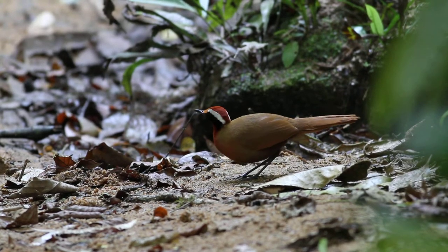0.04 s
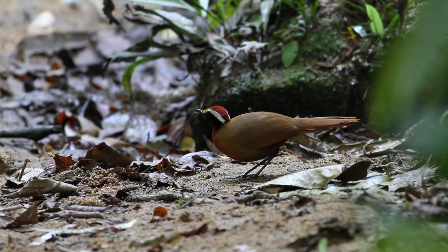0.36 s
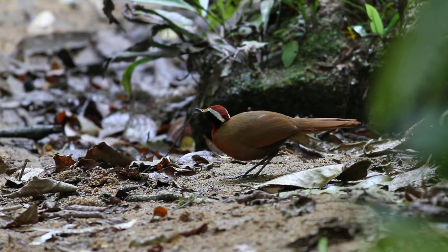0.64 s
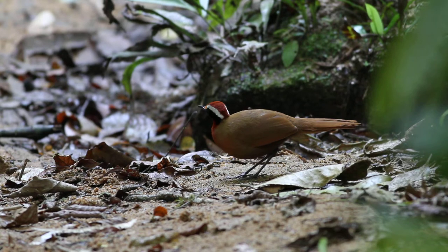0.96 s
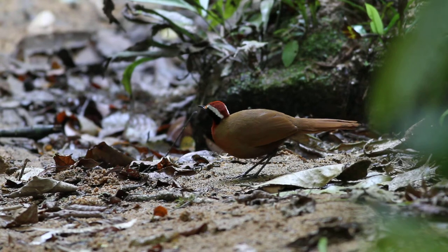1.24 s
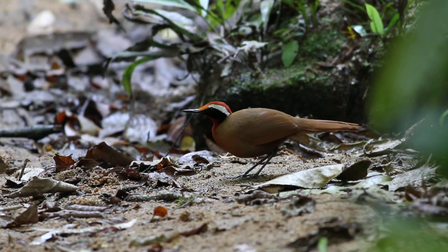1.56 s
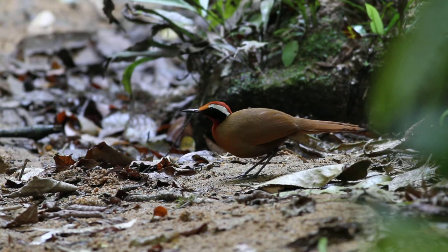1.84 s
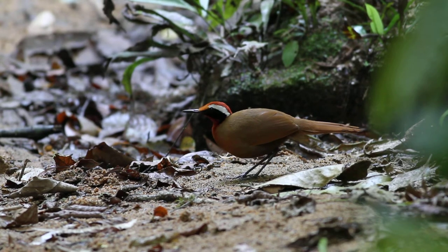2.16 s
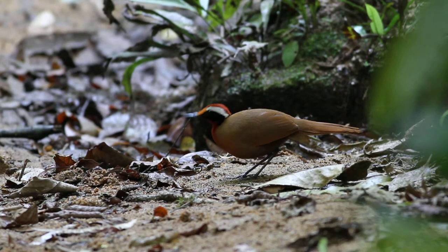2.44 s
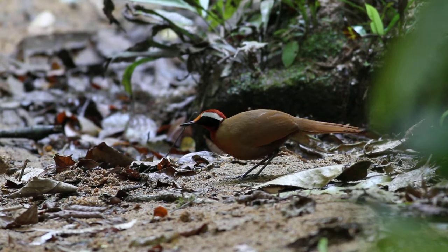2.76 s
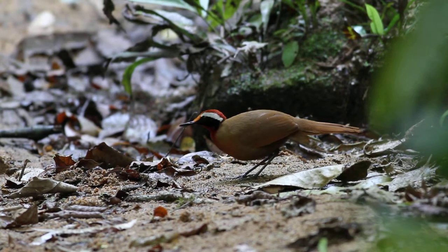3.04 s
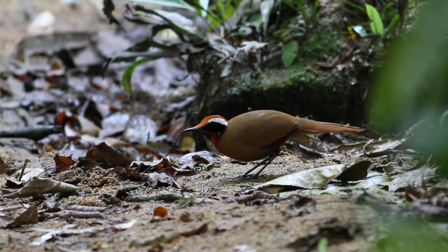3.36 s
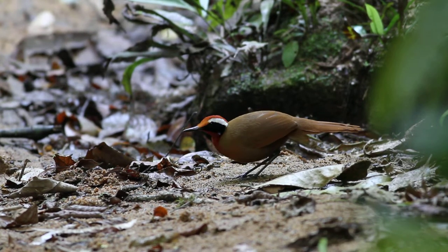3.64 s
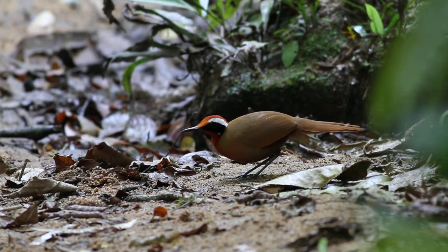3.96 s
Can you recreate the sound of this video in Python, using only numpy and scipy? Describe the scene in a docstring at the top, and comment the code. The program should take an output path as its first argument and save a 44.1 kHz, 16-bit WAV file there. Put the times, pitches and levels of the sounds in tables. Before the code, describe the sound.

A continuous, high cicada drone pulses close by, with thinner buzzes and a distant chorus hissing among the trees. Three quiet bird whistles come early, and small ticks in fallen leaves lead to one brief, late rustle.

```python
"""A loud, throbbing cicada drone fills a forest, at about 3 kHz. Around this near singer, neighbours
throb, and one cicada holds a slowly rising whine that fades in and out among the trees. One rasps, two
buzz, and a high sizzle and a far chorus hiss behind. Cicadas sing by clicking tymbals, small drums on
the body; the belly pumps the sound to make it throb. A bird whistles three times and another holds a
faint low note. Dry leaves on the ground tick, and rustle once near the end."""
import sys
import numpy as np
from scipy import signal
from scipy.fft import rfft, irfft
from scipy.io import wavfile

SR = 44100
rng = np.random.default_rng(int(sys.argv[2]) if len(sys.argv) > 2 else 0)


def wav_out(sig):
    """Save sig, one row per channel (or a flat mono array), as 16-bit PCM at SR to the path in sys.argv[1]."""
    wavfile.write(sys.argv[1], SR, np.round(np.clip(np.atleast_2d(sig).T, -1, 1) * 32767).astype(np.int16))


N = 176400
T = np.arange(N) / SR  # time of each sample [s]
HZ = np.fft.rfftfreq(N, 1 / SR)  # frequency of each slot in a spectrum [Hz]


def amp(db):
    """Turns decibels into a number to multiply by."""
    return 10 ** (np.asarray(db) / 20)


def unit(x):
    """Scales a signal to an average strength (rms) of 1."""
    return x / np.sqrt(np.mean(abs(x) ** 2) + 1e-20)


def curve(rows, column=1):
    """One column of a table, joined by straight lines in time."""
    rows = np.array(rows)
    return np.interp(T, rows[:, 0], rows[:, column])


def colour(points, hz):
    """Reads from a table how strong the given frequencies are."""
    table_hz, db = np.transpose(points)
    return amp(np.interp(np.log(hz + 1), np.log(table_hz + 1), db))


def noise(gain):
    """A hiss of strength 1, shaped by a gain for each frequency."""
    return unit(irfft(rfft(rng.standard_normal(N)) * gain, N))


def drift(rate_hz):
    """A smooth random wobble of strength 1, up to about this fast."""
    return noise(np.exp(-.5 * (HZ / rate_hz) ** 2) * (HZ > 0))


def phase(hz):
    """The growing angle of a wave at this pitch, from a random start."""
    return 2 * np.pi * (np.cumsum(hz * np.ones(N)) / SR + rng.random())


def ring(hz, width_hz):
    """Many tymbals ringing out of step around one pitch."""
    angle = phase(hz)
    return drift(width_hz) * np.cos(angle) + drift(width_hz) * np.sin(angle)


def throbbing(hz, rate_hz, depth, bend=0):
    """A tymbal tone that the belly pumps in level and, with bend, in pitch."""
    beat = np.cos(phase(rate_hz + .3 * drift(5)))
    return unit(np.exp(depth * beat) * np.sin(phase(hz) + bend * beat))


def forest_echo(x, fade_s=.63, delay_s=.023):
    """A blurred echo from trunks and leaves, falling 60 dB in fade_s."""
    t = T[:SR]
    tail = rng.standard_normal(SR) * amp(-60 * t / fade_s) * (t > delay_s)
    return signal.fftconvolve(x, tail / np.linalg.norm(tail))[:N]


# Tone colour of the forest's hush (frequency [Hz], relative level [dB])
AIR_COLOUR = [(20, -17), (50, -10.5), (110, -6.5), (190, -4), (255, 2.5), (360, -2), (700, -4),
              (1400, -6.5), (2200, -2), (6000, -1), (6700, 2), (7350, -3.5), (7800, 7), (8400, -1.5),
              (10000, -1), (11200, -5.5), (12300, -3.5), (12650, 9), (13000, 5), (13900, 9.5), (14400, 3),
              (14750, -16), (15500, -12)]

def forest_air(level_db=-41):
    """A soft, nearly steady hush."""
    return noise(colour(AIR_COLOUR, HZ)) * amp(level_db + .5 * drift(10))


def clicks(rate_hz):
    """One sharp tymbal click in every cycle."""
    samples_from_click = (phase(rate_hz) / (2 * np.pi) % 1 - .5) * SR / rate_hz
    return np.exp(-.5 * samples_from_click ** 2)


# Tone colour of the far chorus (frequency [Hz], relative level [dB])
CHORUS_COLOUR = [(1800, -32.5), (2300, -24), (2520, -10), (2930, -13.5), (3040, 7), (3200, 10),
                 (3310, -13.5), (3430, -2.5), (3650, -8), (4020, 1), (4280, 2), (4430, -0.5), (4750, 0),
                 (5330, -2.5), (5470, -9), (5720, -9.5), (5920, -27), (6600, -45)]
# Its loudness (time [s], level before the boost [dB])
CHORUS_LEVEL = [(0, -33), (1.1, -32), (3.2, -34), (4, -34.5)]

def far_chorus(count=7, middle_rate_hz=170, blur=.8, boost_db=.5):
    """Distant cicadas, each clicking at its own slowly gliding rate, over the blur of many more."""
    singers = rng.uniform(-1, 1, (count, 2))
    clicking = sum(clicks(middle_rate_hz * np.exp(.3 * pace + .004 * glide * T))
                   for pace, glide in singers)
    body = colour(CHORUS_COLOUR, HZ)
    voices = unit(irfft(rfft(clicking) * body, N))
    crowd = unit(unit(voices + forest_echo(voices)) + blur * noise(body))
    return crowd * amp(curve(CHORUS_LEVEL) + boost_db + .5 * drift(14))


# Ticks in dry leaves (start [s], level [dB], centre frequency [Hz], width [octaves])
LEAF_TICKS = [(0.383, -37, 9600, 0.56), (.646, -32, 10000, 0.64), (0.813, -42.5, 1960, 0.14),
              (.815, -41, 9500, .15), (1.9, -48, 1450, .25), (2.057, -38, 11500, .15),
              (2.419, -45, 1470, 0.16)]
# Overlapping bursts that make one rustle (peak time [s], spread [s], level [dB])
RUSTLE_BURSTS = [(3.831, .009, -36), (3.846, .005, -38.5), (3.81, .06, -49.5), (3.884, .008, -45)]
# Tone colour of the rustle (frequency [Hz], relative level [dB])
RUSTLE_COLOUR = [(100, -22), (220, 7), (400, -6), (1100, -2), (1650, 10.5), (1900, -1), (2250, 10.5),
                 (3200, -10), (6500, -5), (12000, -2), (15000, -12)]

def leaf_litter(tick_decay_s=.005, grain_db=3, echo=.14):
    """Fallen leaves give short dry ticks and a grainy rustle."""
    out = np.zeros(N)
    for start, db, hz, octaves in LEAF_TICKS:
        hiss = noise(np.exp(-.5 * (np.log2((HZ + 1) / hz) / octaves) ** 2))
        out += amp(db) * hiss * (T >= start) * np.exp(-abs(T - start) / tick_decay_s)
    for peak, spread, db in RUSTLE_BURSTS:
        grains = unit(noise(colour(RUSTLE_COLOUR, HZ)) * amp(grain_db * drift(200)))
        out += amp(db) * grains * np.exp(-.5 * ((T - peak) / spread) ** 2)
    return out + echo * forest_echo(out)


# Three short whistles and a long low one (start [s], length [s], level [dB], pitch [Hz])
BIRD_NOTES = [(0.018, 0.054, -41.5, 2117), (0.402, 0.051, -41.5, 2128), (0.864, 0.047, -43, 2124),
              (3.195, 0.39, -59, 1626)]

def birds(scoop=.018, scoop_s=.01, rise_s=.024, fade_s=.04, echo=.55):
    """Pure notes that scoop up to pitch and linger among the trees."""
    out = np.zeros(N)
    for start, length, db, hz in BIRD_NOTES:
        age = np.maximum(T - start, 0)
        rise = np.minimum(age / rise_s, 1)
        fade = np.exp(-np.maximum(age - length, 0) / fade_s)
        pitch = hz * (1 - scoop * np.exp(-age / scoop_s))
        out += amp(db) * rise * fade * unit(np.sin(phase(pitch)))
    return out + echo * forest_echo(out)


def buzz(rate_hz, body, waver_db, even_db=0):
    """Multiples of a tymbal's click rate ring in the body; each wavers on its way through the trees."""
    lowest, highest = int(body[0][0] / rate_hz[0]), int(body[-1][0] / rate_hz[0]) + 2
    out = np.zeros(N)
    for k in range(lowest, highest + 1):
        overtone = colour(body, k * rate_hz) * np.sin(phase(k * rate_hz))
        out += overtone * amp(waver_db * drift(3.7) + even_db * (k % 2 == 0))
    return unit(out)


# How the thin buzzer's body rings (frequency [Hz], relative level [dB])
THIN_BODY = [(6400, -25), (6770, -1), (7130, -0.5), (7480, 3), (7840, 0.5), (8200, 1), (8550, -2.5),
             (8910, -23), (9270, -52), (9700, -12)]

def thin_buzz(click_hz=356.4, level_db=-51.5):
    """A cicada clicks fast and evenly, making a faint, high buzz."""
    rate_hz = click_hz * (1 + .00087 * drift(38))
    return amp(level_db) * buzz(rate_hz, THIN_BODY, waver_db=3.5)


# Loudness of the slowing buzz (time [s], level [dB])
SLOWING_LEVEL = [(0, -36), (.5, -35), (.9, -39), (1.4, -48), (4, -54)]
# How this cicada's body rings (frequency [Hz], relative level [dB])
SLOWING_BODY = [(3500, -16), (4000, 0), (4280, 3), (4600, -6), (5200, -1), (5500, -16)]

def slowing_buzz(first_click_hz=150.5, slowing_per_s=.068):
    """A cicada clicks ever more slowly, so its buzz sinks as it dies away."""
    rate_hz = first_click_hz * np.exp(-slowing_per_s * T) * (1 + .0005 * drift(30))
    return amp(curve(SLOWING_LEVEL)) * buzz(rate_hz, SLOWING_BODY, waver_db=3, even_db=-6)


# The sizzle's two tones, before their trims
# (time [s], top pitch [Hz], top level [dB], lower level [dB])
SIZZLE_TONES = [(0, 13200, -39.5, -49), (.35, 13700, -36.5, -47.5), (1.2, 13640, -33.5, -45),
                (2.1, 13470, -34, -45), (2.35, 13560, -35.5, -45), (3, 13620, -35, -55),
                (4, 13400, -36, -64)]

def sizzle(top_trim_db=.5, lower_trim_db=-3.5, flutter_db=2):
    """Third and fourth overtones of a fluttering group of tymbals; the nearest adds clear tones."""
    top_hz = curve(SIZZLE_TONES)
    lower_hz = top_hz * 3 / 4
    wobble_hz = 25 * drift(6.14)
    group = unit(ring(top_hz, width_hz=190) * amp(flutter_db * drift(90)))
    nearest = throbbing(top_hz + wobble_hz, rate_hz=135, depth=.3, bend=1.4)
    top = unit(group + 1.1 * nearest)
    lower = unit(ring(lower_hz, width_hz=93) + np.sin(phase(lower_hz + wobble_hz)))
    return (top * amp(curve(SIZZLE_TONES, column=2) + top_trim_db)
            + lower * amp(curve(SIZZLE_TONES, column=3) + lower_trim_db))


# Loudness of the rasp (time [s], level before the boost [dB])
RASP_LEVEL = [(0, -42.5), (1.55, -40.5), (1.7, -43.5), (2.75, -46), (3.1, -38.5), (3.25, -48.5),
              (3.52, -37), (4, -44)]

def rasping_cicada(pitch_hz=4545, boost_db=4):
    """A rough, unsteady tone that comes and goes."""
    tone = np.sin(phase(pitch_hz + 18 * drift(27.3)))
    roughness = .5 * ring(pitch_hz, width_hz=19.5)
    return amp(curve(RASP_LEVEL) + boost_db) * unit(tone + roughness)


# Moments when the whine fades among the trees (time [s], level until the next dip [dB])
WHINE_DIPS = [(-.05, -40), (.11, -32), (.27, -31), (.6, -30), (.74, -35), (.91, -34), (1.11, -33),
              (1.27, -33), (1.34, -33), (1.64, -32), (1.9, -30), (2.02, -33.5), (2.53, -32), (2.68, -34),
              (2.77, -38), (2.87, -37), (3.04, -38), (3.28, -36), (3.51, -37), (3.61, -35), (3.72, -42),
              (3.79, -37), (3.92, -37)]
# Its slowly rising pitch (time [s], pitch [Hz])
WHINE_PITCH = [(0, 5497), (4, 5578)]

def whining_cicada(dip_s=.038, bend_hz=6, jitter_hz=3, ring_db=-49):
    """A held, slowly rising whine; it dips when its different paths through the trees cancel out."""
    dip_times, levels = np.transpose(WHINE_DIPS)
    from_dip_s = abs(T[:, None] - dip_times).min(1)
    fading = np.tanh(.12 + (from_dip_s / dip_s) ** 2)  # near 0 in a dip, up to 1 between dips
    hz = curve(WHINE_PITCH) + bend_hz * (fading - 1) + jitter_hz * drift(55)
    db = levels[np.searchsorted(dip_times, T) - 1] + 2 * drift(10.7)
    tone = amp(db) * fading * unit(np.sin(phase(hz)))
    return tone + amp(ring_db) * ring(curve(WHINE_PITCH), width_hz=23.3)


# Faint tones; the third is the whine's side tone (first pitch [Hz], last pitch [Hz], throb rate [Hz])
FAINT_TONES = [(3056, 3074, 39), (3350, 3540, 62), (5190, 5285, 105), (13500, 14120, 70)]
# The same tones at peak_s (level [dB], throb depth [no unit])
FAINT_LEVELS = [(-35, 0.56), (-50.5, .27), (-47, 0.31), (-50, .3)]

def faint_throbs(jitter_hz=1.33, waver_db=2.5, peak_s=1, fade_db_per_s=2):
    """Faint throbbing, rising tones: neighbouring cicadas and a side tone just below the whine."""
    out = np.zeros(N)
    for (first_hz, last_hz, rate_hz), (db, depth) in zip(FAINT_TONES, FAINT_LEVELS):
        hz = np.linspace(first_hz, last_hz, N) + jitter_hz * drift(16)
        out += amp(db) * unit(throbbing(hz, rate_hz, depth) * amp(waver_db * drift(2.9)))
    return out * amp(-fade_db_per_s * abs(T - peak_s))


# The near cicada's slowly sinking pitch (time [s], pitch [Hz])
NEAR_PITCH = [(0, 3191), (.9, 3179), (2, 3166), (3, 3155), (4, 3151)]
# Loudness of its three main tones (time [s], lower [dB], middle [dB], upper [dB])
NEAR_LEVELS = [(0.0, -32.0, -29.5, -32.5), (0.54, -36.0, -41.0, -31.0), (0.78, -28.5, -22.5, -29.5),
               (0.96, -29.0, -23.0, -40.5), (1.38, -33.0, -31.0, -28.5), (1.44, -28.0, -27.0, -34.5),
               (1.98, -33.0, -30.0, -35.5), (2.7, -41.5, -27.5, -32.0), (2.82, -37.5, -37.0, -37.5),
               (3.24, -35.0, -26.0, -33.5), (3.36, -42.0, -39.5, -35.5), (3.54, -33.0, -30.0, -27.5),
               (3.98, -35.0, -47.0, -39.0)]

def near_cicada(throb_hz=39, outer_db=-44, waver_db=1.3, skew=.9, echo=.25):
    """Five tones, throb_hz apart, blend into one loud throb; each fades on its own among the trees."""
    middle = phase(curve(NEAR_PITCH) + drift(7.4))
    beat = phase(throb_hz + .3 * drift(5))
    levels = [outer_db, curve(NEAR_LEVELS, 1), curve(NEAR_LEVELS, 2), curve(NEAR_LEVELS, 3), outer_db]
    song = np.zeros(N)
    for step, db in enumerate(levels, -2):
        tone = np.sin(middle + step * beat + skew * step ** 2)  # skew keeps the peaks from lining up
        song += amp(db + waver_db * drift(7.5)) * tone
    return song + echo * forest_echo(song)


def scene():
    """All the voices of the forest, heard from one spot."""
    singers = near_cicada() + faint_throbs() + whining_cicada() + rasping_cicada()
    background = sizzle() + slowing_buzz() + thin_buzz() + far_chorus() + forest_air()
    return (singers + background + birds() + leaf_litter())[None]


def record(dry, cutoff_hz=15150):
    """Cuts away the very highest treble."""
    low_pass = signal.firwin(511, cutoff_hz, window=("kaiser", 9), fs=SR)
    return signal.oaconvolve(dry, low_pass[None], "same")


dry = scene()
out = record(dry)
wav_out(out)
```